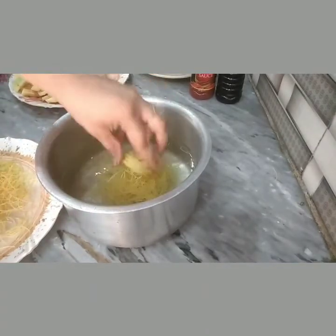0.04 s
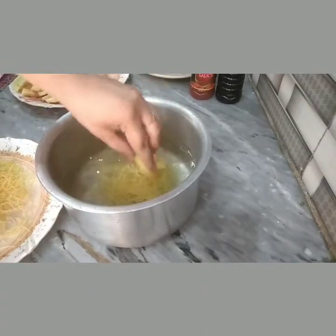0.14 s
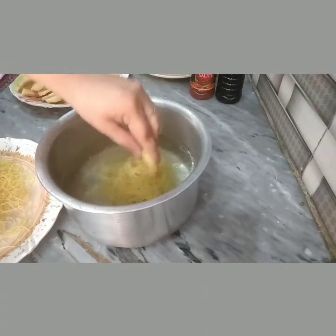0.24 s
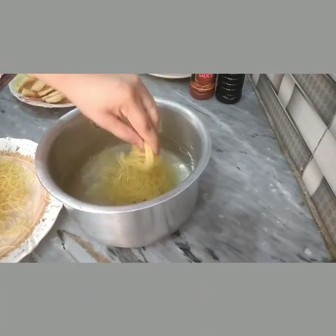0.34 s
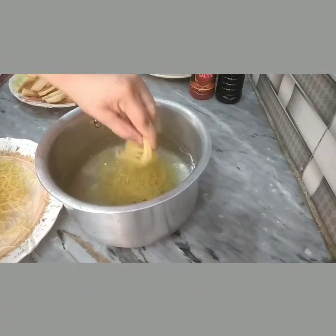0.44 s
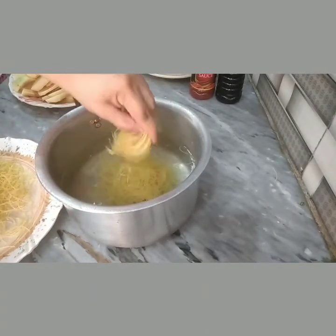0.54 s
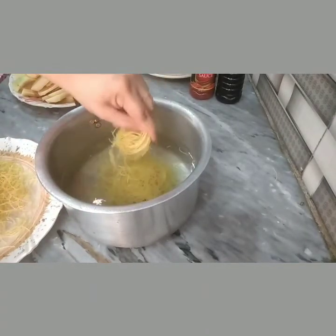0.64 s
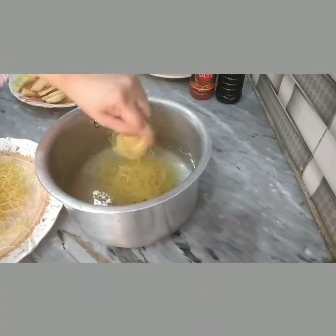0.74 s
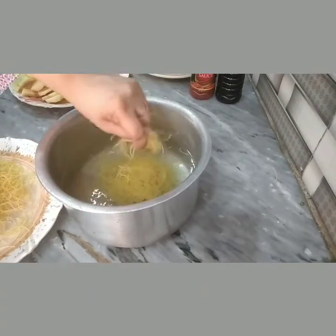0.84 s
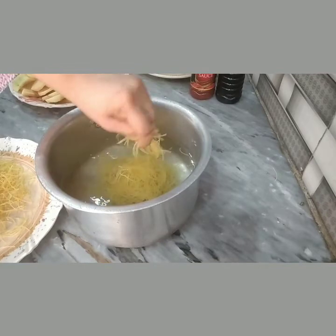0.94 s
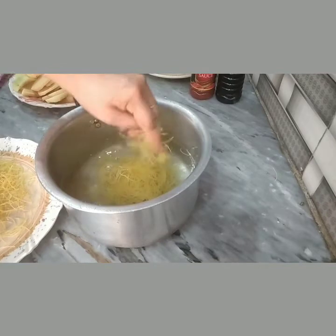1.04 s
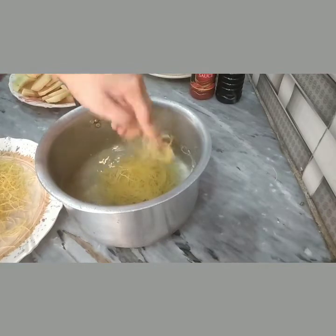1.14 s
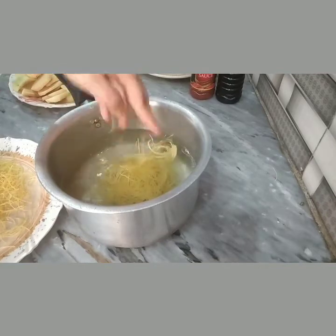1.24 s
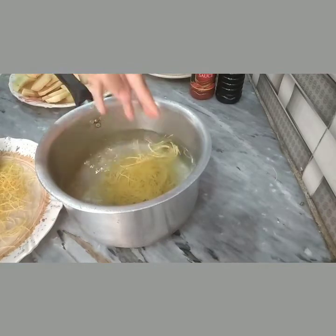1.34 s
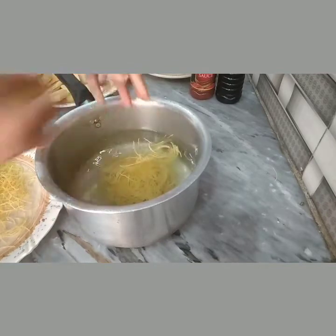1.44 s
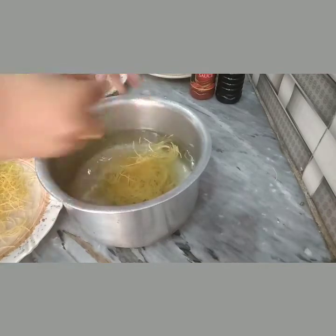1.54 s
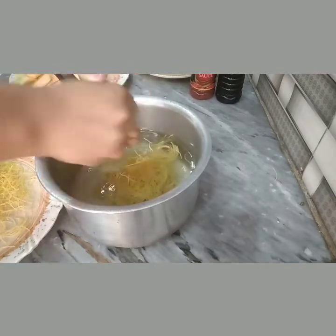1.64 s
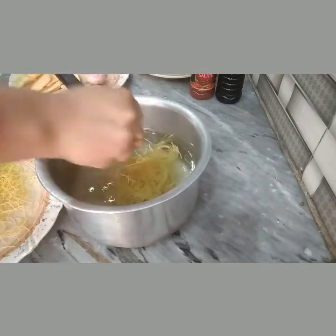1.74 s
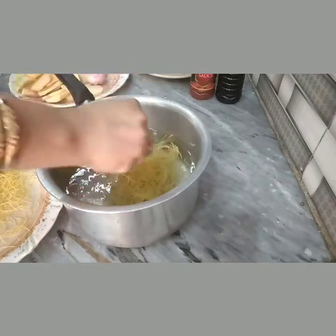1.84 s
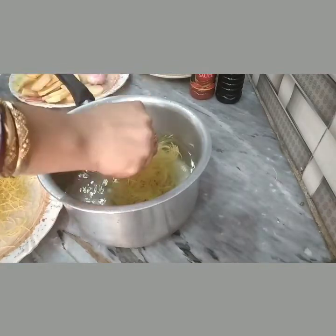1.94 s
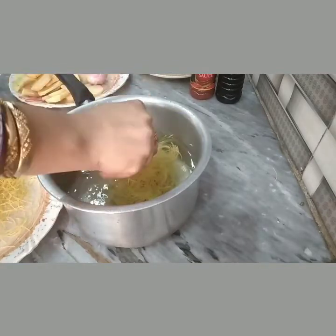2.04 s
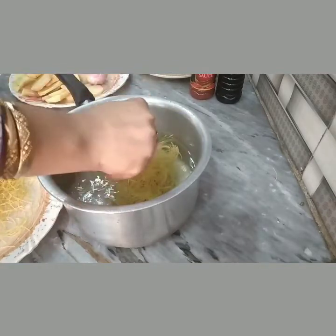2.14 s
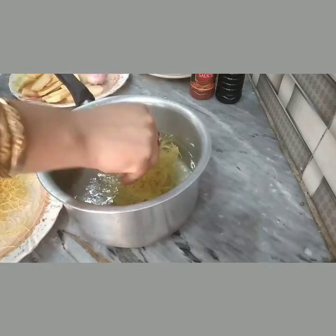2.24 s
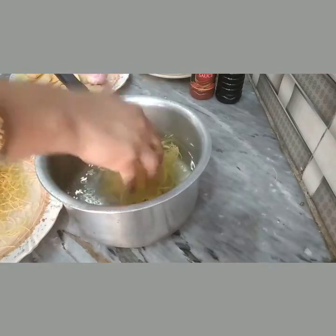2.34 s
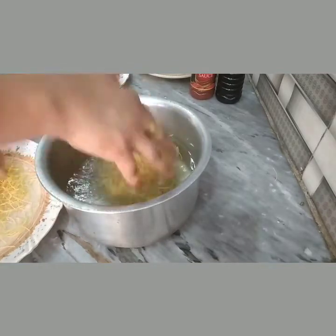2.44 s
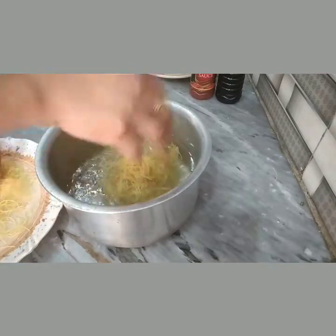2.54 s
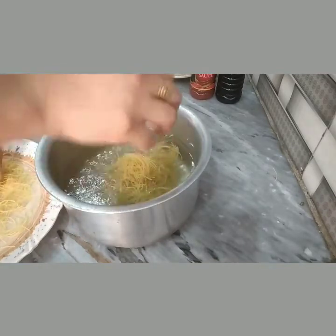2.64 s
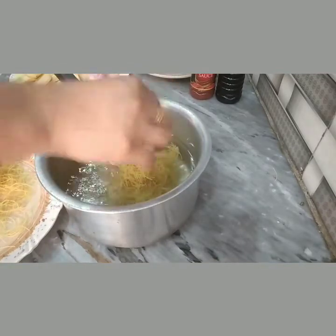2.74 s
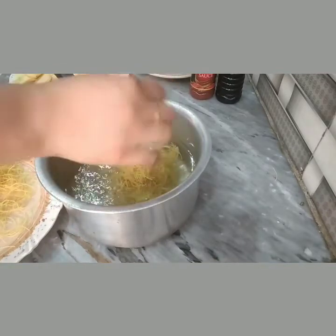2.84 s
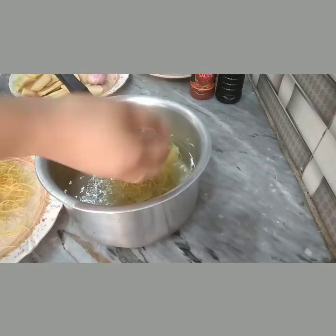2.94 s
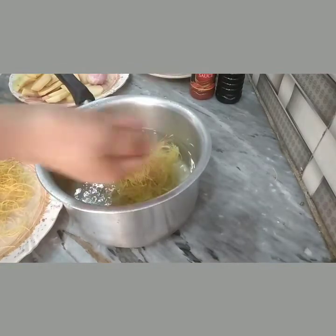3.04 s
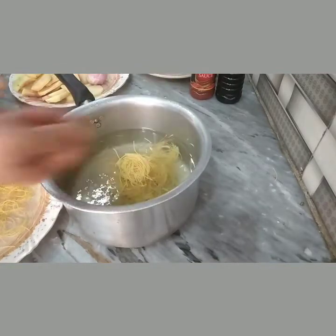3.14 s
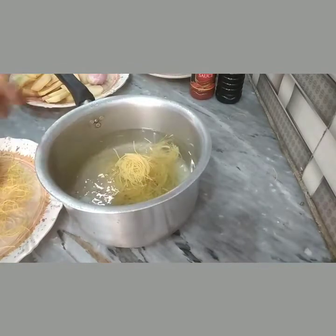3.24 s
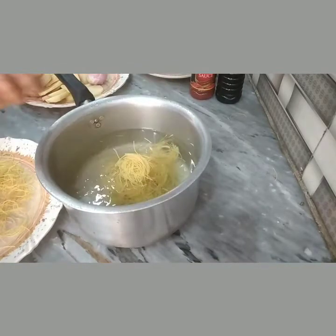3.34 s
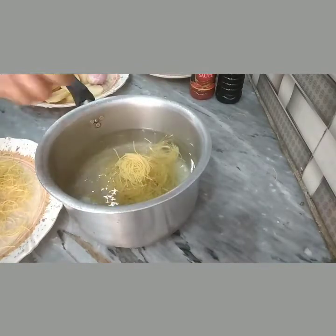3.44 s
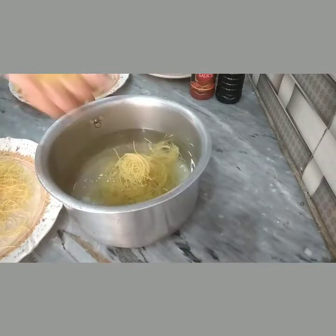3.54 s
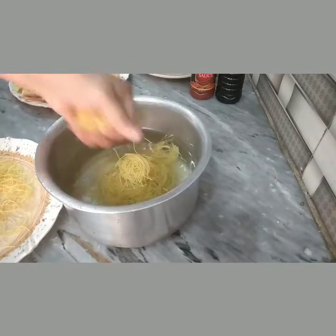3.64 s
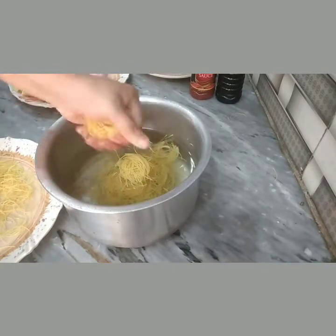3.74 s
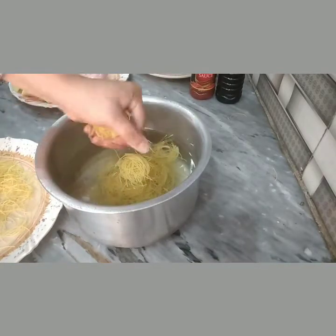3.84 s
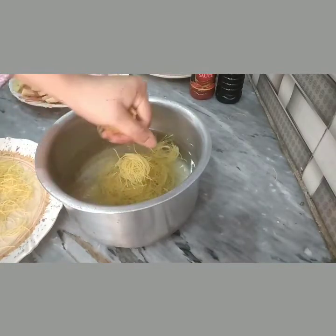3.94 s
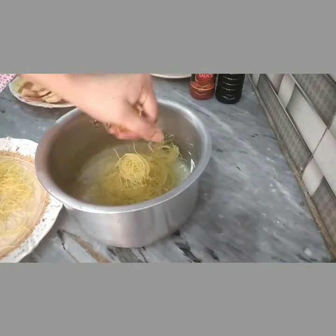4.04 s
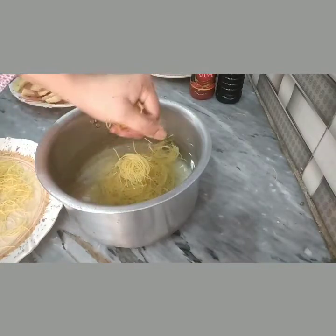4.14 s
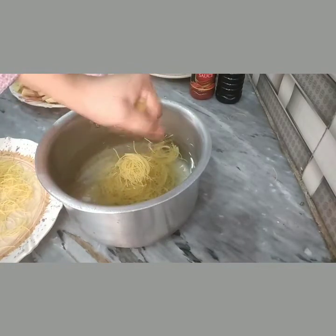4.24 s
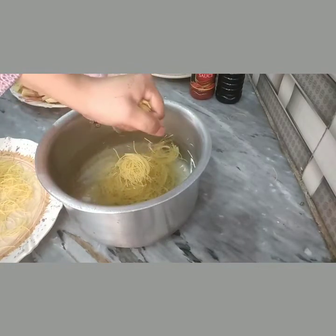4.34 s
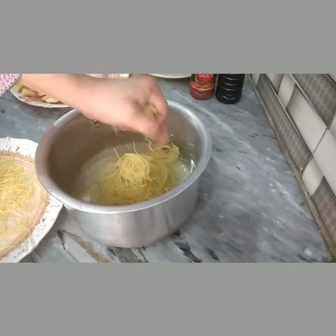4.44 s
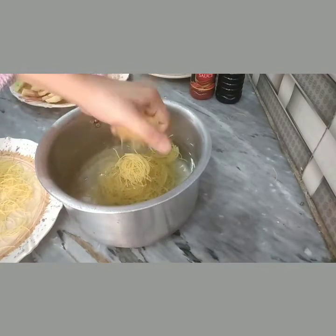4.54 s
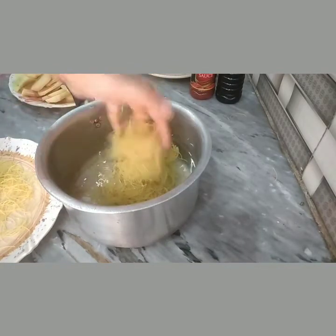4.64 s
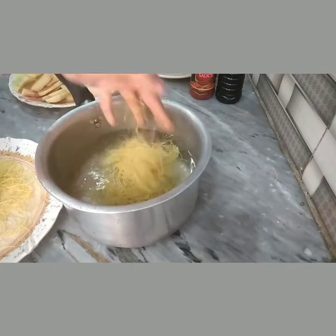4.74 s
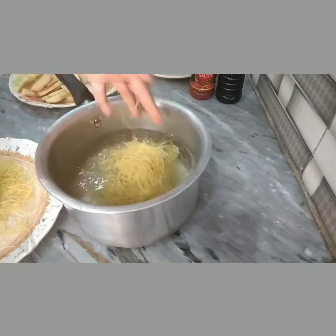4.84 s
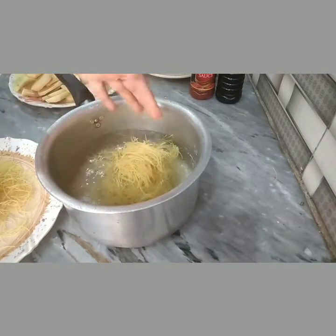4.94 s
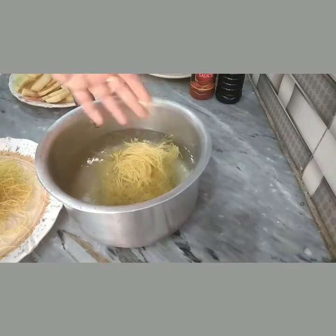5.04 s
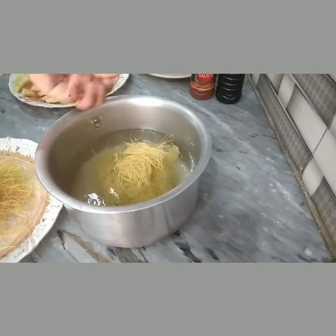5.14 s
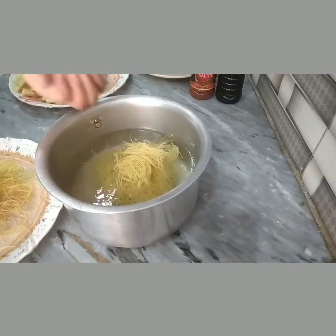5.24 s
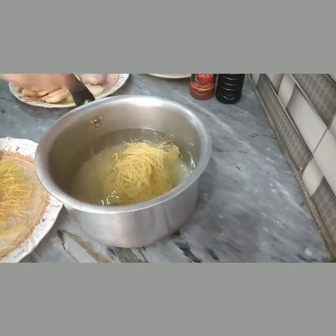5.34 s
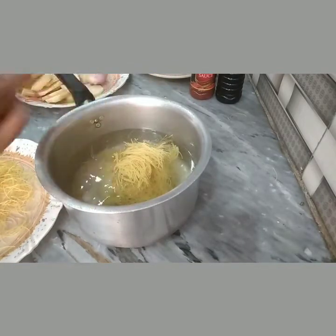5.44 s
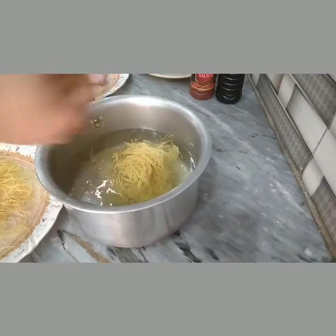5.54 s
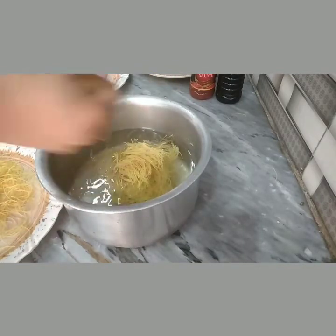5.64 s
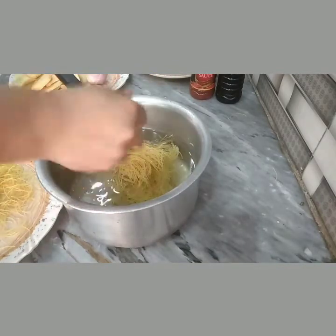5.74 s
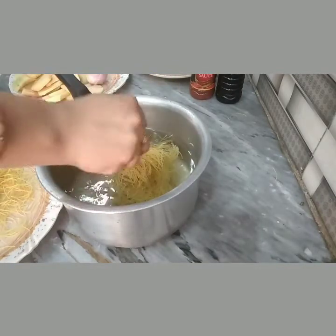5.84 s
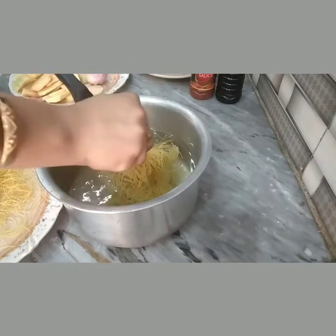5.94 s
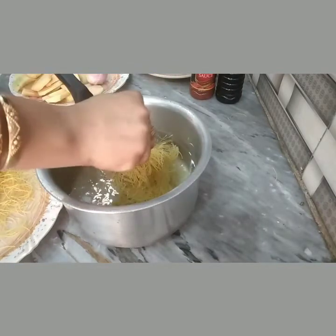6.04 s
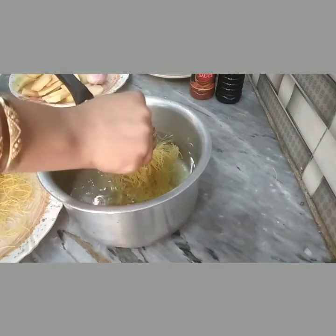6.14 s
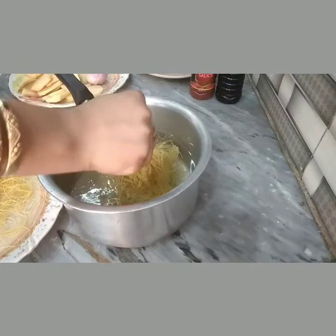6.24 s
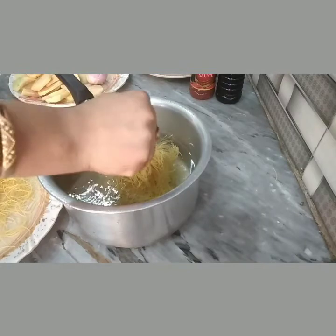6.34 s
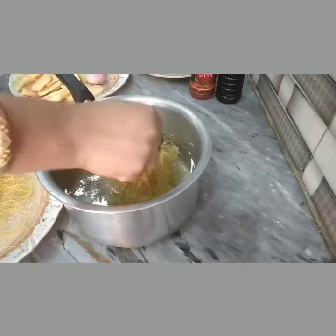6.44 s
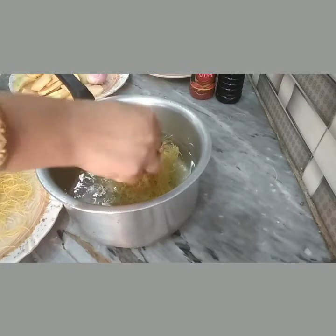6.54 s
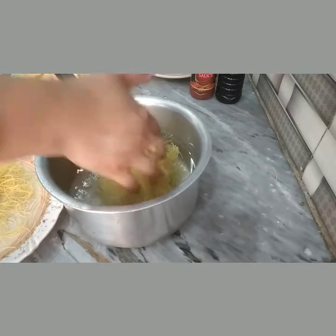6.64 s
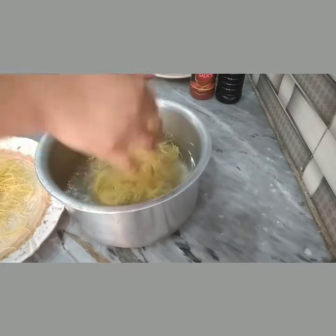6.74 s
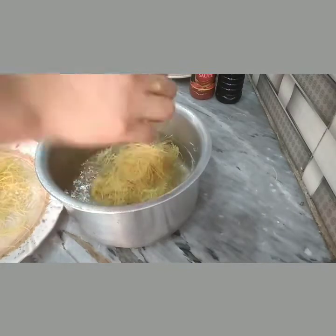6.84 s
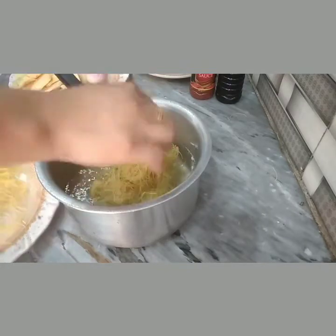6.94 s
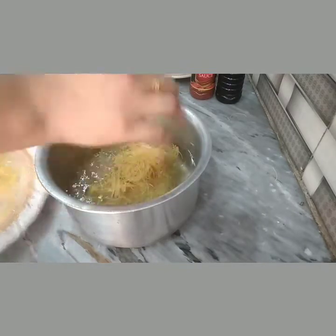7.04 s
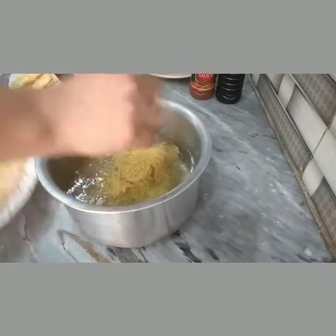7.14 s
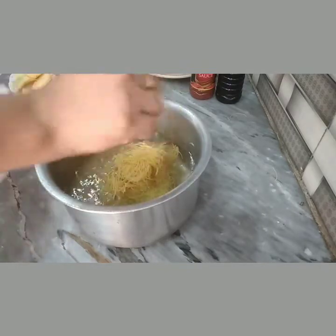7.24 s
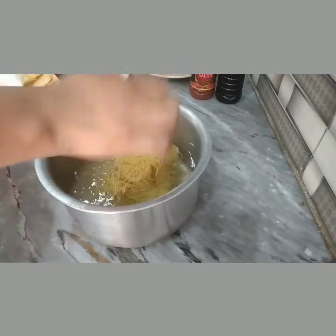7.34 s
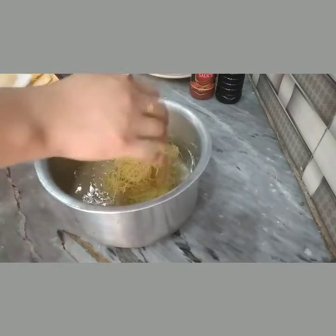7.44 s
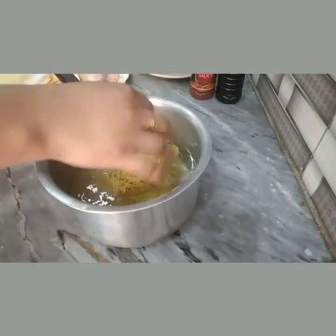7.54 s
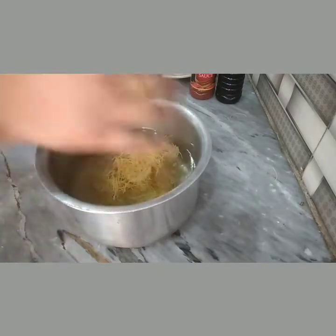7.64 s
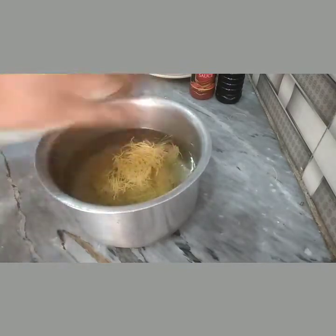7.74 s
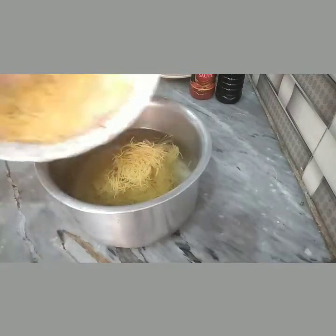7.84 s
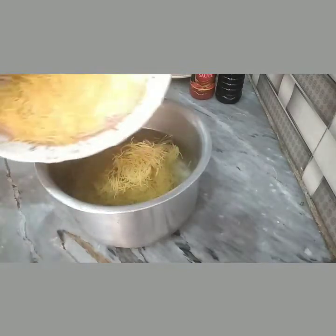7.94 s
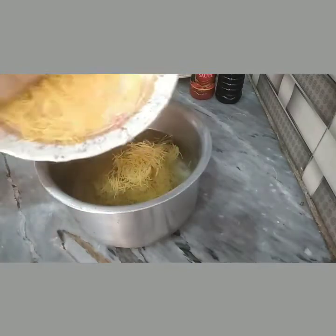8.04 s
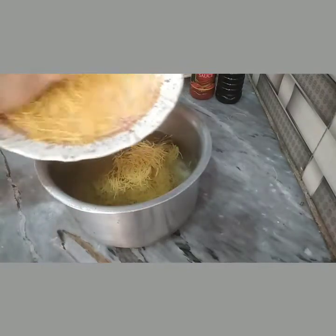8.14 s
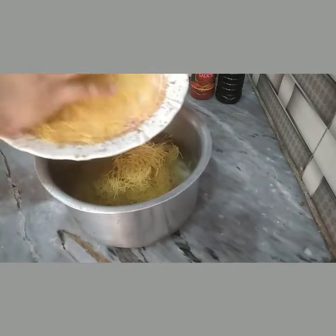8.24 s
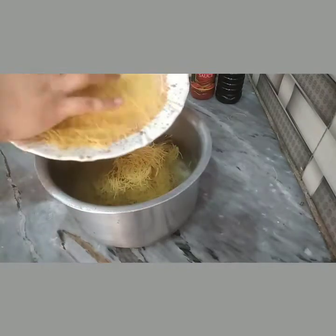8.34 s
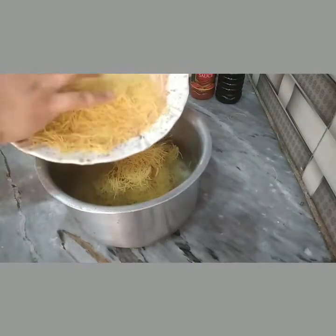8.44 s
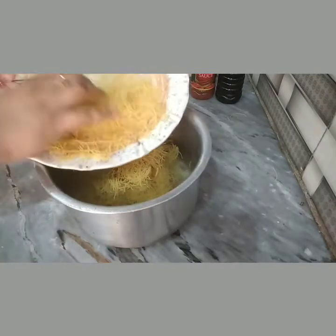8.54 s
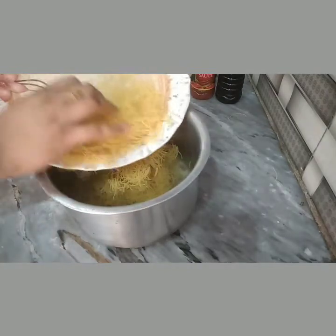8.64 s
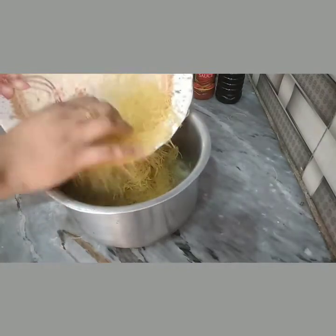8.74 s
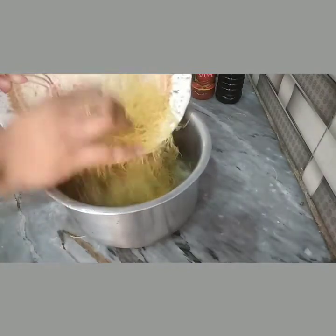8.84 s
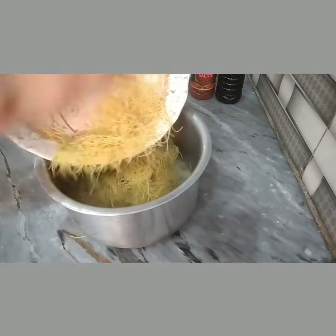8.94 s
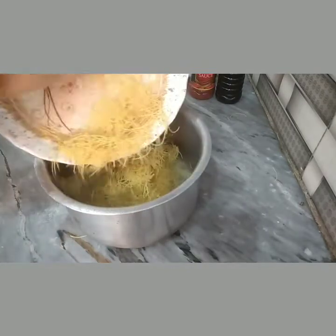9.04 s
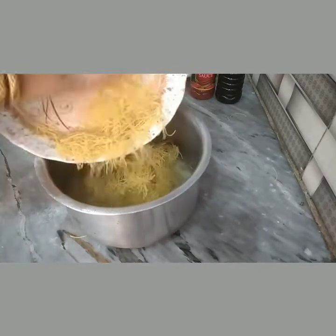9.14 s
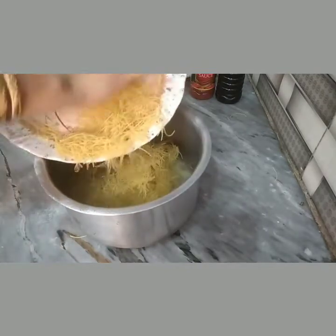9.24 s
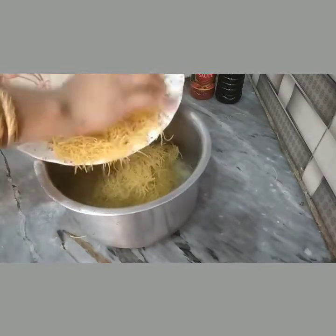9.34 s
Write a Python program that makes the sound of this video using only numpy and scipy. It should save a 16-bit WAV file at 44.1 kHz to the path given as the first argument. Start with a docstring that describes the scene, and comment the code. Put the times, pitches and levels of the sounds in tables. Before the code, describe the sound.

A hand crushes dry vermicelli into a pot in crisp bursts, followed by rubbing and a ringing plate knock, over a faint kitchen hum.

```python
"""Crushing dry noodles over a pot

In a small tiled kitchen, a fist crushes nests of dry vermicelli over a metal pot of water.
Each nest crackles with many tiny breaks, gives way with a crunch and is sprinkled in.
Then fingers sweep the crumbs off a plate, which knocks on the pot and sets both ringing.
A low hum runs underneath, and a noise suppressor turns the treble down in the pauses."""
import sys
import numpy as np
from scipy import signal
from scipy.fft import rfft, irfft, next_fast_len
from scipy.io import wavfile
from scipy.ndimage import uniform_filter1d

SR = 44100
rng = np.random.default_rng(int(sys.argv[2]) if len(sys.argv) > 2 else 0)


def persist_wave(psi):
    """Save psi, clipped to +-1, as 16-bit WAV."""
    counts = np.round(np.clip(psi, -1, 1) * 32767).astype(np.int16)
    wavfile.write(sys.argv[1], SR, np.atleast_2d(counts).T)


N = 413658
TIME = np.arange(N) / SR

# Levels are relative: each layer gets its own gain later. A ring time is the time to fade by 60 dB.
# tone of the room's noise: (frequency [Hz], level [dB])
ROOM_TONE = [(20, -14.5), (40, 13), (60, -12.5), (120, -14.5), (250, -10.5), (400, -7.5), (700, -10.5),
             (1300, -20), (2000, -23), (2600, -34.5), (3300, -52.5), (16000, -50)]
# tones of the steady hum: (frequency [Hz], level [dB])
HUM_TONES = [(102.5, -62), (162, -59), (242, -85), (301.5, -76.5)]
# faint far-off whines: (start [s], end [s], frequency [Hz], width [Hz], level [dB])
WHINES = [(-0.35, 0.6, 1470, 75, -70.5), (-0.3, 0.4, 1620, 200, -68.5), (0.27, 0.48, 1103, 17, -69),
          (0.55, 0.75, 1400, 25, -69)]
# low swells as the hands work: (time [s], hold [s], boom [dB], rumble [dB])
HANDLING = [(0.15, 0.47, -78, -55), (1.85, 0.53, -71, -52), (2.52, 0.09, -34.5, -50), (4.05, .25, -50, -45),
            (4.62, 0.095, -40, -63), (4.94, 0.015, -37, -50), (5.29, .08, -49.5, -58),
            (5.58, 0.091, -41.5, -50), (5.82, .04, -41.5, -60), (5.94, 0.067, -56, -40),
            (6.04, 0.058, -33, -30.5), (6.22, 0.041, -33.5, -36), (6.36, .62, -39, -69.5),
            (7.92, 0.022, -43.5, -69), (8.16, 0.073, -42, -74), (8.37, .09, -37, -62),
            (8.6, 0.019, -24, -57), (8.83, 0.26, -35, -71), (9.3, 0.041, -44.5, -66)]
# tones of the boom, the rumble and their stereo spread: (frequency [Hz], level [dB])
BOOM_TONE = [(90, -40.5), (135, -12), (152, 15.5), (185, -3), (250, -4), (330, -51.5)]
RUMBLE_TONE = [(40, -21.5), (65, -7.5), (80, -3), (102, 0), (125, -5.5), (160, -0.5), (300, -87)]
SPREAD_TONE = [(40, -12), (90, 0), (170, -1), (260, -10), (400, -40)]
# puffs of air on the microphone: (time [s], level [dB])
PUFFS = [(2.287, -34), (2.316, -33), (2.55, -40), (2.77, -44.5)]
# throbs of the boom: (time [s], level [dB])
THROBS = [(6.646, -31.5), (6.692, -35), (6.844, -30.5), (6.897, -28.5), (6.953, -31.5), (9.05, -26)]
# echo of the tiled room: (frequency [Hz], ring time [s])
KITCHEN_ECHO = [(150, 0.32), (600, 0.34), (2000, 0.39), (7000, 0.44), (15000, 0.48)]
# notes of the air in the pot: (frequency [Hz], level [dB], ring time [s])
POT_AIR_NOTES = [(419, -2, 0.24), (533, 3, 0.27), (782, 1, .15), (1120, 2.5, 0.14), (1235, -2.5, 0.066),
                 (1680, -6, 0.023), (1930, -13.5, 0.31), (2300, -15.5, .15), (2244, 7, .15),
                 (2290, -6.5, 0.16), (2477, 1.5, 0.037), (2750, -1.5, 0.038)]

# the plate knocks on the pot: (time [s], level [dB], hardness of the contact [Hz])
KNOCKS = [(8.5, -21, 900), (8.503, -20, 800), (8.5775, -5, 1700), (8.580, -2, 1600), (8.627, -7, 4500),
          (8.630, -8, 3500), (9.119, -25, 800)]
# notes of the knocked plate and pot: (frequency [Hz], level [dB], undamped ring time [s])
KNOCK_NOTES = [(155, -19, 0.38), (427.4, -8.5, 0.19), (533.5, -6, 0.72), (561, -8, 0.47), (662, -13.5, 0.2),
               (734, -15, 0.28), (897, -3, 0.24), (963, -4, 0.27), (1075, -16, 0.99), (1154, -7, 0.21),
               (1206, -7, 0.36), (1538, 10.5, 0.06), (1653, -15, 0.51), (1750, -13.5, 0.2),
               (2020, -16, .33), (2740, -17.5, .3), (3120, -16, 0.37), (4150, -17, 0.3)]
# tone of a knock's clack: (frequency [Hz], level [dB])
CLACK_TONE = [(150, -25.5), (350, -12), (550, 18.5), (750, 8.5), (1000, 16), (1550, 15.5), (1900, 3),
              (2500, 1.5), (3500, -16.5), (5500, -7.5), (7500, -4.5), (11000, -12.5), (16000, -32)]
# fingers sweep crumbs off the plate: (time [s], hold [s], body [dB], hiss [dB], drag [dB])
SWEEPS = [(7.93, 0.11, -67, -60, -73), (8.11, .12, -36, -39, -51), (8.25, .12, -35, -38.5, -48),
          (8.45, 0.19, -51, -44, -55.5), (8.63, 0.053, -27.5, -35, -37.5), (8.78, 0.15, -37, -38.5, -36.5),
          (8.96, 0.2, -47, -45.5, -50)]
# tone of a finger rubbing the plate: (frequency [Hz], level [dB])
RUB_TONE = [(150, -11), (420, -17.5), (540, 1), (700, -8.5),
            (930, 4), (1300, -11), (2000, -11), (4000, -39)]
# plate notes that a dragging finger wakes: (frequency [Hz], level [dB], ring time [s])
DRAG_NOTES = [(524, 10, 0.41), (574, 2, 0.16), (833, -4.5, 0.136), (1034, 6.5, 0.091), (1500, 15, 0.089)]
# loose strands slide off the fingers: (time [s], hold [s], body [dB], hiss [dB])
RUSTLES = [(0.005, .04, -56.5, -63), (2.53, 0.33, -34.5, -37), (2.9, .02, -43, -47),
           (2.96, 0.031, -68, -54), (3.025, 0.076, -43.5, -44.5), (3.13, 0.033, -48.5, -49),
           (3.195, 0.0087, -61, -46.5), (3.378, 0.077, -59.5, -49), (4.52, 1, -38.5, -40.5),
           (4.63, 0.067, -35.5, -41.5), (4.75, 0.19, -49, -43), (4.94, 0.054, -39, -42.5),
           (5.02, 0.07, -48, -48), (5.145, .008, -53, -70), (5.42, .012, -74, -63), (6.68, 0.1, -65, -56),
           (6.9, 0.097, -50.5, -54.5), (7.04, 0.11, -70, -60), (7.305, 0.085, -70.5, -57.5)]
# tones of strands landing and rubbing: (frequency [Hz], level [dB])
LANDING_TONE = [(600, -11), (900, -18), (1200, 5.5), (1600, 5), (2200, 7), (2800, 1), (3500, -2.5),
                (6000, -44)]
HISS_TONE = [(2000, -30), (3600, -8), (5200, -1.5), (6600, 0.5), (7800, 0.5), (9000, -8), (10800, -3),
             (13000, -13), (16000, -19.5)]

# how strongly the hollow of the fist rings: (time [s], level [dB])
GRIP = [(0.8, -15), (2.1, -9), (3.5, -6.5), (4.15, 6), (4.35, 3), (5.6, -12), (6.3, -5.5)]
# notes of that hollow: (frequency [Hz], level [dB], ring time [s])
FIST_NOTES = [(1960, 0, .25), (2030, 1, .2), (2130, 2.5, 0.086), (2290, 0.5, .03), (2420, -5.5, .15),
              (2684, -1.5, 0.054)]
# the strongest strands snap one by one: (time [s], pop [dB], splinters [dB], pop pitch [Hz])
SNAPS = [(0.555, -50, -41, 2050), (0.566, -30.5, -44.5, 1630), (0.604, -47, -39, 1500),
         (0.765, -38.5, -36, 1580), (0.79, -24, -28, 1520), (0.799, -25, -39, 1210),
         (1.537, -52, -32.5, 2320), (1.588, -42, -35.5, 2350), (1.667, -20, -26.5, 1700),
         (1.72, -20, -27.5, 1030), (1.843, -16, -32.5, 1230), (3.044, -32, -61, 2130),
         (3.377, -39.5, -39.5, 2100), (3.496, -23, -34, 2260), (3.517, -19, -31, 2280),
         (3.57, -20, -30, 2180), (3.585, -16, -38.5, 2190), (3.591, -13, -32, 2270),
         (3.614, -21, -35, 1710), (3.639, -19.5, -30.5, 2330), (3.691, -14.5, -31, 2230),
         (3.703, -18.5, -34.5, 2065), (3.724, -11.5, -34.5, 2580), (3.78, -23.5, -28.5, 2220),
         (3.791, -16.5, -29.5, 2630), (3.832, -21, -28, 2240), (3.847, -13, -28.5, 2250),
         (3.879, -16, -38.5, 2580), (3.894, -13.5, -34, 2010), (3.94, -16, -29.5, 2570),
         (3.996, -34, -25.5, 2550), (4.014, -19.5, -27, 2590), (4.134, -18, -25, 2010),
         (5.737, -21, -34.5, 1700), (5.845, -20, -23, 1040), (5.96, -15.5, -33.5, 2200),
         (5.993, -16.5, -29.5, 1500), (6.113, -14.5, -24.5, 2150), (6.232, -21, -26, 2320)]
# part or all of a nest gives way: (peak time [s], level [dB], rise [s], fall [s])
COLLAPSES = [(0.803, -34.5, 0.01, .014), (2.101, -19.5, 0.011, 0.011), (3.534, -18, 0.00055, 0.0013),
             (3.587, -36.5, 0.005, 0.004), (4.301, -12.5, 0.0084, 0.013), (5.849, -33, 0.00059, .003),
             (6.286, -12, 0.012, 0.005), (6.339, -25.5, 0.017, 0.012)]
# the fist squeezes or the fingers pinch: (time [s], hold [s], dull crunch [dB], bright crackle [dB])
SQUEEZES = [(0.305, 0.042, -78, -61), (0.45, .03, -84, -59), (0.485, 0.027, -73, -50.5),
            (0.565, 0.012, -52.5, -39), (0.785, 0.036, -38.5, -32), (0.93, 0.015, -78, -47),
            (1.187, 0.0073, -59.5, -59), (1.255, 0.023, -83, -59.5), (1.492, .01, -66.5, -53.5),
            (1.615, 0.18, -38, -33), (1.7, 0.12, -33.5, -32.5), (1.83, 0.36, -29.5, -29),
            (2.075, 0.028, -20.5, -22), (2.42, .04, -72, -48), (3.51, .12, -36.5, -35),
            (3.7, 0.1, -40, -37), (3.79, 0.14, -32, -32.5), (4.035, 0.079, -34.5, -32.5),
            (4.148, 0.036, -24.5, -24.5), (4.22, 0.11, -24.5, -25), (5.635, .05, -57, -47),
            (5.7, 0.055, -43, -37), (5.77, .17, -35, -34), (5.97, .2, -35.5, -33.5),
            (6.2, 0.071, -44.5, -33.5), (6.27, 0.027, -25.5, -21.5), (6.33, 0.029, -29, -34.5),
            (6.65, 0.062, -59, -48.5)]
# tones of a muffled pop, a collapse, the crunch and the crackle: (frequency [Hz], level [dB])
POP_TONE = [(300, -12), (700, -4), (1050, -2), (1600, 0), (2500, -1.5), (3000, -0.5), (4200, -21.5)]
COLLAPSE_TONE = [(120, -21.5), (260, -11), (400, -3), (600, 1), (850, 7), (1500, 2), (2100, 6.5),
                 (3200, -9), (5000, -11.5), (7500, -8), (11000, -21), (16000, -13.5)]
CRUNCH_TONE = [(200, -23), (500, -20.5), (700, -8.5), (1000, -1.5), (1300, 0.5), (1700, -3), (2150, 1.5),
               (2400, 2), (2650, 4), (3100, -7.5), (4500, -13), (8000, -57)]
CRACKLE_TONE = [(1500, -23.5), (3200, -26), (4300, -7), (6000, -3), (6900, 1.5), (7900, 1.5), (8900, -4),
                (10400, 2.5), (11500, 1.5), (13000, -5.5), (16000, -10)]

# the microphone's two openings each colour the sound: (frequency [Hz], left minus right [dB])
MIC_TILT = [(100, -1.5), (400, -1), (700, 1.5), (1300, -1.5), (3500, 2), (5800, 2.5), (7200, 9), (8600, 4),
            (10000, -11), (11000, -24), (13000, -2.5), (16000, -22)]
# treble bands of the noise suppressor: (lower edge [Hz], threshold [dB], deepest cut [dB])
SUPPRESSOR_BANDS = [(3100, -59, 12), (5000, -64.5, 15), (8800, -66, 15)]


def from_db(db):
    """Turn decibels into a gain to multiply by."""
    return 10 ** (np.asarray(db) / 20)


def unit_power(x):
    """Scale a sound to an average power of 1."""
    return x / np.sqrt(np.mean(x ** 2) + 1e-20)


def at_hz(points, hz):
    """Read between the rows of a table, giving each octave equal room."""
    frequencies, values = np.transpose(points)
    return np.interp(np.log(np.maximum(hz, 1)), np.log(frequencies), values)


def convolve(x, response):
    """Pass a sound through an echo pattern or a filter's response."""
    return signal.oaconvolve(np.atleast_2d(x), np.atleast_2d(response), axes=1)[:, :N]


def colour(x, tone, size=4096):
    """Filter a sound with a tone table; white noise keeps its power."""
    cepstrum = irfft(np.log(from_db(at_hz(tone, np.fft.rfftfreq(size, 1 / SR)))))
    # minimum phase: the filter never sounds ahead of a click
    cepstrum[1:size // 2] *= 2
    cepstrum[size // 2 + 1:] = 0
    response = irfft(np.exp(rfft(cepstrum)))
    return convolve(x, response / np.linalg.norm(response))


def ring(clicks, hz, ring_s):
    """Each click starts a fading sine wave as tall as itself."""
    decay, step = from_db(-60 / (ring_s * SR)), 2 * np.pi * hz / SR
    return signal.lfilter([0, np.sin(step)], [1, -2 * decay * np.cos(step), decay ** 2], clicks + 1e-18)


def resonate(x, notes):
    """A sound sets several notes ringing, each peaking at its own gain."""
    return sum(from_db(db) * 2 * np.log(1000) / (ring_s * SR) * ring(x, hz, ring_s)
               for hz, db, ring_s in notes)


def drift(per_s):
    """A random wander, about 1 in size."""
    knots = np.arange(0, TIME[-1] + 1, 1 / per_s)
    return unit_power(np.interp(TIME, knots, rng.standard_normal(len(knots))))


def steady(x, seconds):
    """Even out slow swells, leaving a power of 1."""
    power = uniform_filter1d(x ** 2, int(seconds * SR), axis=-1)
    return x / np.sqrt(np.abs(power) + 1e-9)


def add(track, s, sound):
    """Mix a short sound in at s seconds."""
    start = int(round(s * SR))
    track[..., start:start + sound.shape[-1]] += sound[..., :N - start]


def strokes(rows, attack_s, release_s, slowing, sag_db_per_s):
    """Hand movements rise, sag as they hold and die away; gives one gain curve per dB column."""
    coarse_time, powers = TIME[::20], 0
    for s, hold_s, *levels_db in rows:
        age = coarse_time - s
        extra_s = slowing * hold_s   # long strokes start and stop more slowly
        rise_db = 20 * np.maximum(-age, 0) / (attack_s + extra_s)
        fall_db = 20 * np.maximum(age - hold_s, 0) / (release_s + extra_s)
        shape_db = np.maximum(-rise_db - fall_db - sag_db_per_s * np.maximum(age, 0), -120)
        powers = powers + from_db(np.add.outer(levels_db, shape_db)) ** 2
    return [np.interp(TIME, coarse_time, np.sqrt(power)) for power in powers]


def judder(depth_db=1.68, per_s=60):
    """A hand never presses evenly: a gain that shakes around 1."""
    return unit_power(from_db(depth_db * drift(per_s)))


def grains(per_s, spread_db, clump_db, max_lag_samples=6):
    """Tiny random clicks of uneven size, in clumps; each reaches left and right from its own place."""
    sizes_db = spread_db * np.minimum(rng.exponential(1, N), 3) + clump_db * drift(150)
    sizes = from_db(sizes_db) * rng.choice([-1, 1], N)
    lag = rng.integers(-max_lag_samples, max_lag_samples + 1, N)
    pan = rng.uniform(0, np.pi / 2, N)
    at = np.flatnonzero(rng.random(N) < per_s / SR)
    clicks = np.zeros((2, N))
    clicks[0, at] = sizes[at] * np.cos(pan[at])
    clicks[1, np.clip(at + lag[at], 0, N - 1)] = sizes[at] * np.sin(pan[at])
    return steady(clicks, 0.021)


def background():
    """Dull room noise and a slightly wavering hum."""
    centre, side = colour(rng.standard_normal((2, N)), ROOM_TONE)
    hum = sum(from_db(db) * np.sqrt(2) * np.sin(2 * np.pi * hz * TIME + 1.2 * drift(1.6))
              for hz, db in HUM_TONES)
    return from_db(-63.5) * (centre + 0.69 * side * np.array([[1], [-1]])) + hum


def whines():
    """Thin wavering tones fade in and out near the start."""
    out = 0
    for start, end, hz, width, db in WHINES:
        fade = np.sqrt(np.clip(4 * (TIME - start) * (end - TIME) / (end - start) ** 2, 0, 1))
        tone = ring(rng.standard_normal(N), hz, np.log(1000) / (np.pi * width))
        out = out + from_db(db) * fade * steady(tone, 0.21)
    return out


def handling():
    """A hollow boom and a rumble swell as the hands work."""
    boom, rumble = strokes(HANDLING, attack_s=0.037, release_s=0.11, slowing=0.1, sag_db_per_s=1)
    # both go on faintly between the swells
    boom, rumble = np.hypot(boom, from_db(-54.5)), np.hypot(rumble, from_db(-57.5))
    noise = rng.standard_normal((4, N))
    hollow = steady(ring(noise[0], hz=167, ring_s=0.35), 0.17)
    hollow = hollow + 0.7 * steady(colour(noise[1], BOOM_TONE), 0.66)
    deep = steady(colour(noise[2], RUMBLE_TONE), 0.078)
    centre = from_db(-4.5) * boom * hollow + from_db(1) * rumble * deep
    side = (from_db(-19) * boom + from_db(-16) * rumble) * colour(noise[3], SPREAD_TONE)
    return centre + side * [[1], [-1]]


def puffs(width_s=0.016):
    """Air from the moving arm gives the microphone one soft pull and push per puff."""
    return sum(from_db(db) * (TIME - s) / 0.0063 * np.exp(-((TIME - s) / width_s) ** 2)
               for s, db in PUFFS)


def throbs(hz=167, width_s=0.013):
    """Short swells of the boom's low note."""
    return sum(from_db(db) * np.exp(-((TIME - s) / width_s) ** 2) * np.sin(2 * np.pi * hz * (TIME - s))
               for s, db in THROBS)


def evened(response, octaves=0.17):
    """Take the broad colour out of an echo pattern and keep its fine ripple."""
    hz = np.fft.rfftfreq(len(response), 1 / SR)
    energy = np.cumsum(np.abs(rfft(response)) ** 2)
    centres = np.geomspace(100, 17000, 200)
    low, high = centres / 2 ** octaves, centres * 2 ** octaves
    band_power = (np.interp(high, hz, energy) - np.interp(low, hz, energy)) / (high - low)
    return colour(response, np.transpose([centres, -10 * np.log10(band_power)]))[0]


def kitchen(x, near_db=-1.5, near_s=0.0044, far_db=-7.5, size=30000):
    """Direct sound, a quick scatter off pot and counter, then the echo of the tiled room."""
    t, hz = np.arange(size) / SR, np.fft.rfftfreq(size, 1 / SR)
    far_noise, near_noise = rng.standard_normal((2, 2, size))
    edges = np.geomspace(80, 18000, 9)
    spectrum, far = rfft(far_noise), 0
    for low, high in zip(edges, edges[1:]):
        ring_s = at_hz(KITCHEN_ECHO, np.sqrt(low * high))
        far = far + irfft(spectrum * (hz >= low) * (hz < high)) * from_db(-60 * t / ring_s)
    far = from_db(far_db) * unit_power(far * (t > 0.005))
    near = from_db(near_db) * unit_power(near_noise * np.exp(-t / near_s) * (t > 0.0006))
    response = (t == 0) + (near + far) / np.sqrt(size)
    response = np.array([evened(side) for side in response])
    return convolve(x, response / np.linalg.norm(response, axis=1, keepdims=True))


def pot_air(x):
    """Sound made over the pot sets the air inside it ringing."""
    return x + from_db(-5.5) * resonate(x, POT_AIR_NOTES)


def plate_knocks(clack_s=0.0068, held_ring_s=0.33, size=1500):
    """Each knock clacks and sets plate and pot ringing; the holding hand damps the longest notes."""
    blows, clacks, t = np.zeros(N), np.zeros((2, N)), np.arange(size) / SR
    for s, db, hardness_hz in KNOCKS:
        push = np.exp(-2 * np.pi * hardness_hz * t)   # a harder contact is shorter
        add(blows, s, from_db(db) * push / push.sum())
        chatter = 0.11 * rng.standard_normal((2, size)) * np.exp(-t / clack_s)
        add(clacks, s, from_db(db) * ((t == 0) + chatter))
    notes = sum((-1) ** k * from_db(db) * ring(blows, hz, min(ring_s, held_ring_s))
                for k, (hz, db, ring_s) in enumerate(KNOCK_NOTES))
    return from_db(-14) * notes + from_db(14.5) * colour(clacks, CLACK_TONE)


def finger_drag(pressure):
    """The friction of dragging fingers makes the plate drone."""
    rub = colour(pressure * grains(per_s=6000, spread_db=2.5, clump_db=2.5), RUB_TONE)
    return from_db(-1.5) * (rub + resonate(rub, DRAG_NOTES))


def sprinkling(swept_body, swept_hiss):
    """Loose strands and swept crumbs land with a fine patter and rub with a hiss."""
    body, hiss = strokes(RUSTLES, attack_s=0.021, release_s=0.029, slowing=0.034, sag_db_per_s=48)
    body, hiss = (body + swept_body) * judder(), hiss + swept_hiss
    landings = body * grains(per_s=2500, spread_db=1, clump_db=3, max_lag_samples=4)
    rubbing = hiss * grains(per_s=11000, spread_db=-4.5, clump_db=1.5)
    return from_db(-3) * colour(landings, LANDING_TONE) + from_db(-0.5) * colour(rubbing, HISS_TONE)


def fist_hollow(x, dull_below_hz=3200, closing=1.1):
    """A tighter fist muffles the dull part of each break and rings with it instead."""
    times, grip_db = np.transpose(GRIP)
    grip = from_db(np.interp(TIME, times, grip_db)) * (TIME >= times[0]) * (TIME <= times[-1])
    dull = signal.sosfiltfilt(signal.butter(2, dull_below_hz, fs=SR, output="sos"), x)
    blocked = dull * (1 - 1 / np.sqrt(1 + closing * grip ** 2))
    return x - blocked + resonate(x * grip, FIST_NOTES)


def stray_snaps(crunch, crackle, per_s=22, pitch_hz=2050, ceiling_db=-30, count=400):
    """Lesser snaps at uneven times, following the strength of the squeeze; rows as in SNAPS."""
    jitter, size, pitch = rng.standard_normal((count, 3)).T
    times = (np.arange(count) + jitter / 2) / per_s
    squeeze_db = 20 * np.log10([np.interp(times, TIME, gain) for gain in (crunch, crackle)])
    # past the ceiling, a harder squeeze makes these snaps no louder
    pop_db, splinter_db = np.minimum(squeeze_db, ceiling_db) + 3 * size
    rows = np.transpose([times, pop_db + 7.5, splinter_db - 0.5, pitch_hz * np.exp(0.2 * pitch)])
    return list(rows[(times > 0) & (times < SQUEEZES[-1][0])])


def snapping(snaps, pop_s=0.00063, splinter_s=0.0015, lag_s=0.00005, size=900):
    """A strand breaks with a pop of a few cycles and a brief shower of splinters."""
    pops, splinters, t = np.zeros((2, N)), np.zeros((2, N)), np.arange(size) / SR
    showers, places = rng.standard_normal((len(snaps), 2, size)), rng.standard_normal(len(snaps))
    for (s, pop_db, splinter_db, hz), shower, place in zip(snaps, showers, places):
        age = np.maximum(t + place * lag_s * np.array([[0.5], [-0.5]]), 0)   # one side hears it first
        swell = age / pop_s * np.exp(1 - 2 * age / pop_s)
        add(pops, s + 0.0008, from_db(pop_db) * swell * np.sin(2 * np.pi * hz * age))
        add(splinters, s + 0.0006, from_db(splinter_db) * shower * np.exp(-t / splinter_s))
    return colour(pops, POP_TONE) + from_db(8) * colour(splinters, CRACKLE_TONE)


def collapsing():
    """An avalanche of breaks swells and dies away as a nest caves in."""
    swell = sum(from_db(db) * np.exp(-np.maximum((s - TIME) / rise, (TIME - s) / fall))
                for s, db, rise, fall in COLLAPSES)
    return from_db(3.5) * colour(swell * grains(per_s=4200, spread_db=0, clump_db=3.5), COLLAPSE_TONE)


def lull_before_snap(dip_db=-1.5, dip_s=0.01):
    """The crumbling eases for a moment while a strong strand bears the load, just before it snaps."""
    times = np.array(sorted(row[0] for row in SNAPS) + [np.inf])
    until_snap = times[np.searchsorted(times, TIME)] - TIME
    return from_db(dip_db * np.exp(-(until_snap / dip_s) ** 2))


def crushing(crunch, crackle):
    """Every breaking strand sprays treble; the thicker ones also make a dull crunch."""
    thick = grains(per_s=1300, spread_db=2.5, clump_db=1, max_lag_samples=1)
    thin = grains(per_s=3000, spread_db=4.5, clump_db=0.5)
    dull = colour(thick * crunch, CRUNCH_TONE)
    bright = colour((thin + 0.32 * thick) * crackle, CRACKLE_TONE)
    return from_db(-1) * (dull + bright) * lull_before_snap()


def scene():
    """Noodles and plate sound in the kitchen, over its low background."""
    squeeze = strokes(SQUEEZES, attack_s=0.011, release_s=0.04, slowing=0.13, sag_db_per_s=0.5)
    crunch, crackle = judder() * np.array(squeeze)
    swept_body, swept_hiss, pressure = strokes(
        SWEEPS, attack_s=0.082, release_s=0.091, slowing=0.21, sag_db_per_s=9.5)
    breaks = crushing(crunch, crackle) + collapsing() + snapping(SNAPS + stray_snaps(crunch, crackle))
    noodles = pot_air(fist_hollow(breaks) + sprinkling(swept_body, swept_hiss))
    plate = plate_knocks() + finger_drag(pressure)
    return kitchen(noodles + plate) + handling() + puffs() + throbs() + background() + whines()


def noise_suppressor(x, cut_db_per_db=2.4, window_s=0.04, order=12):
    """Below its threshold each treble band is turned down, the more the fainter it is."""
    size = next_fast_len(N + 4096)
    spectrum, hz, out = rfft(x, size), np.fft.rfftfreq(size, 1 / SR), x
    above_edge = [1 - 1 / (1 + (hz / row[0]) ** (2 * order)) for row in SUPPRESSOR_BANDS] + [0]
    for k, (_, threshold_db, depth_db) in enumerate(SUPPRESSOR_BANDS):
        band = irfft(spectrum * (above_edge[k] - above_edge[k + 1]), size)[:, :N]
        power = uniform_filter1d(np.mean(band ** 2, axis=0), int(window_s * SR))
        level_db = 10 * np.log10(np.abs(power) + 1e-14)
        gain = from_db(np.clip(cut_db_per_db * (level_db - threshold_db), -depth_db, 0))
        out = out + band * (gain - 1)
    return out


def record(dry, peak_limit=0.88, cutoff_hz=16000, size=2 ** 19):
    """The microphone colours each side, turns faint treble down, rounds peaks and cuts the very top."""
    hz = np.fft.rfftfreq(size, 1 / SR)
    tilt = from_db(at_hz(MIC_TILT, hz) * np.array([[0.5], [-0.5]]))
    tilt /= np.sqrt(np.mean(tilt ** 2, axis=0))
    tilted = irfft(rfft(dry, size) * tilt)[:, :N]
    quieted = noise_suppressor(tilted)
    rounded = quieted / (1 + (quieted / peak_limit) ** 6) ** (1 / 6)
    return signal.sosfilt(signal.ellip(12, 0.2, 80, cutoff_hz, fs=SR, output="sos"), rounded)


dry = scene()
out = record(dry)
persist_wave(out)
```